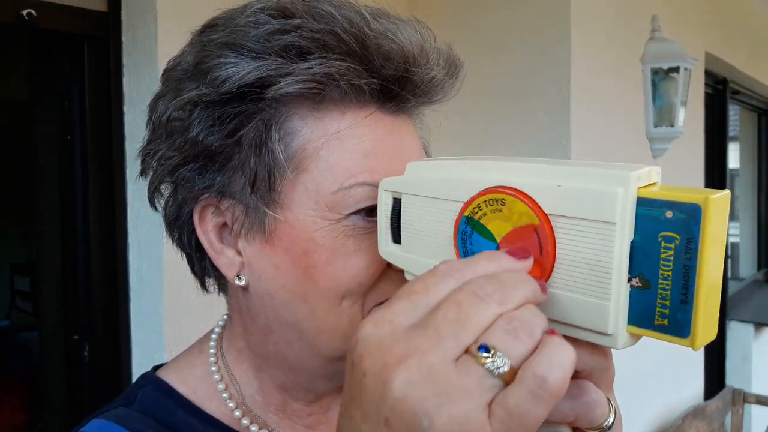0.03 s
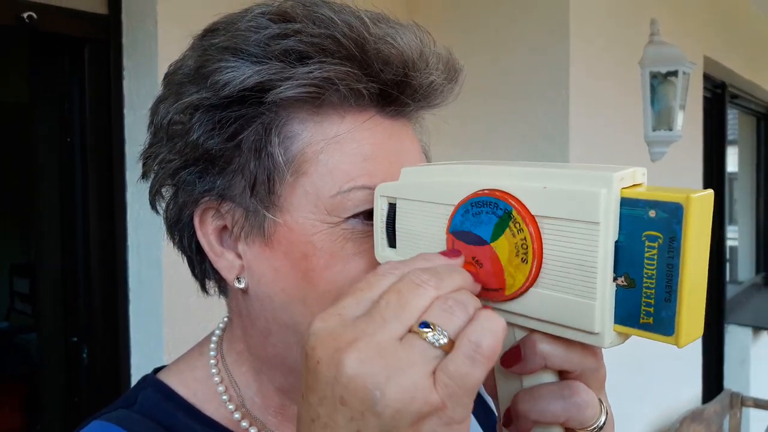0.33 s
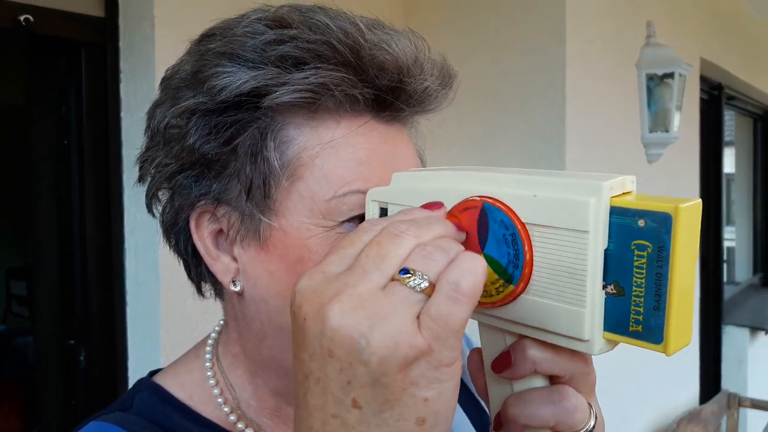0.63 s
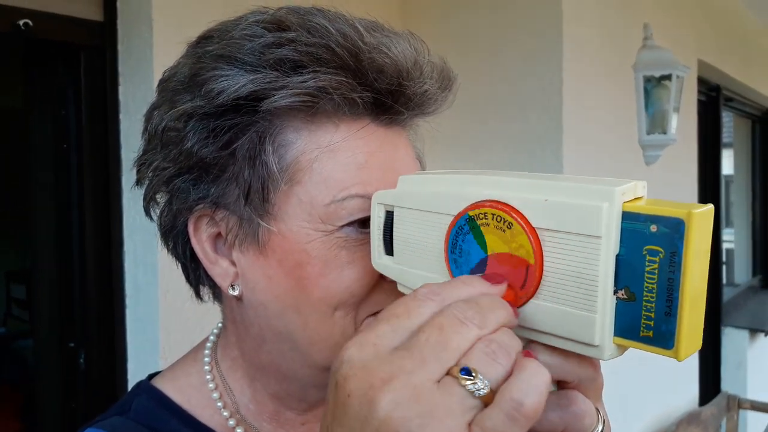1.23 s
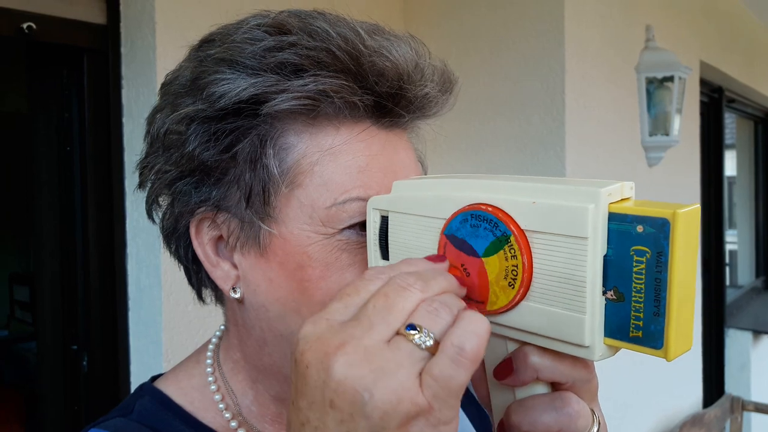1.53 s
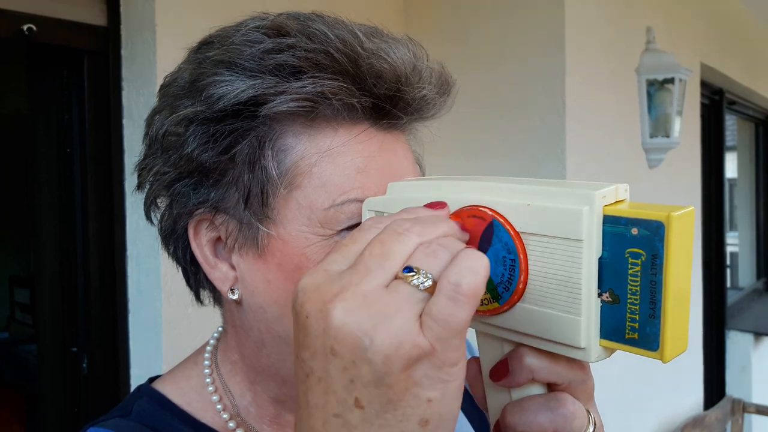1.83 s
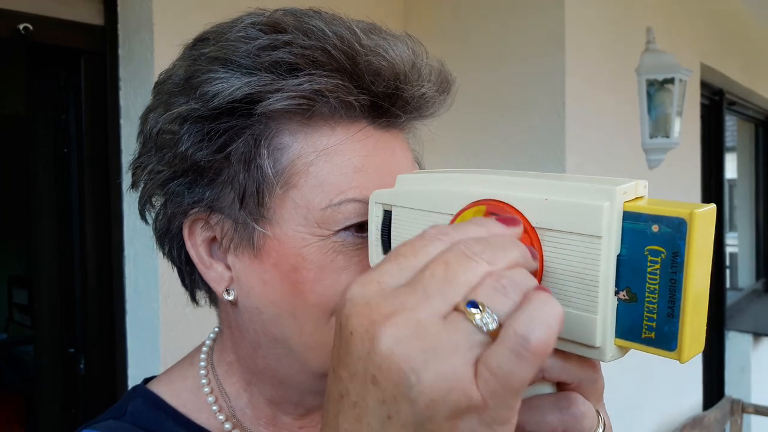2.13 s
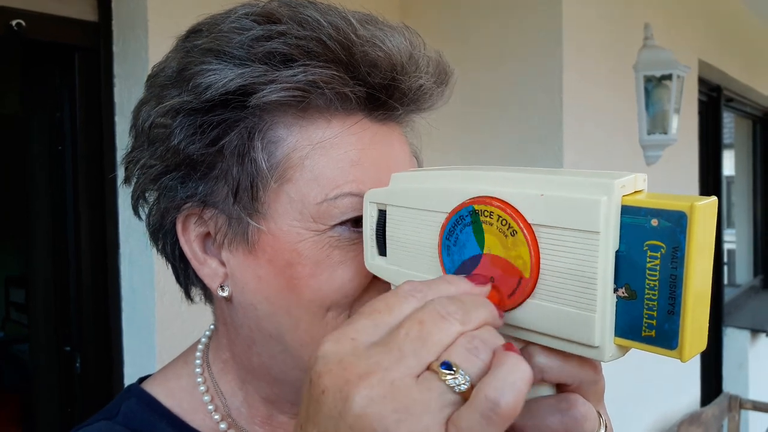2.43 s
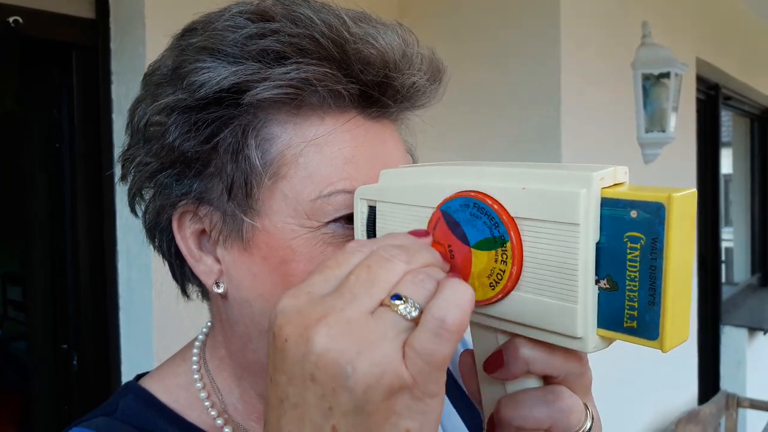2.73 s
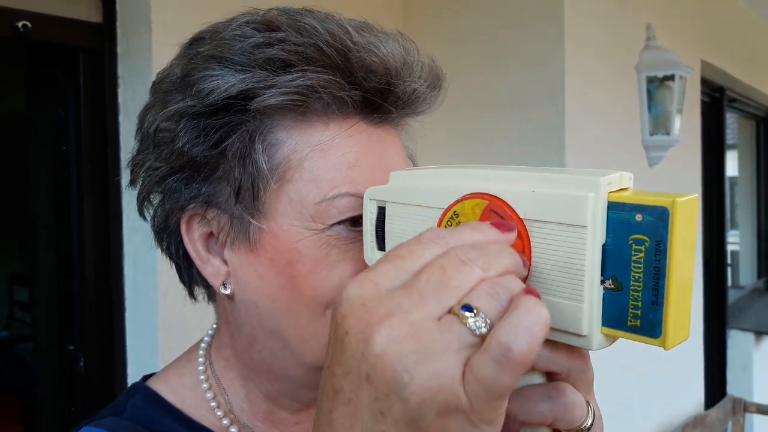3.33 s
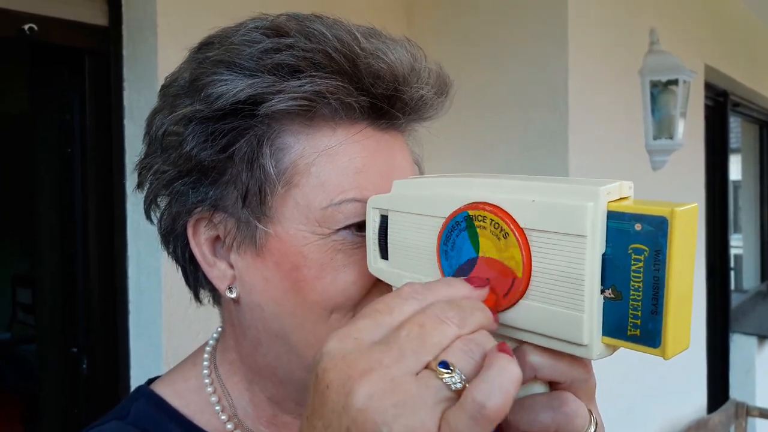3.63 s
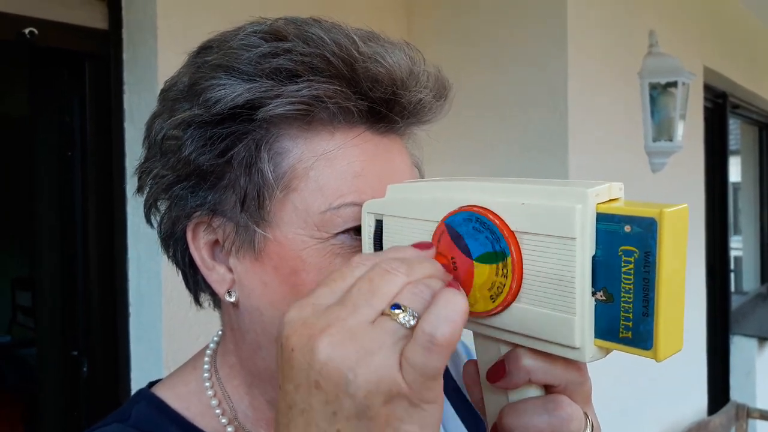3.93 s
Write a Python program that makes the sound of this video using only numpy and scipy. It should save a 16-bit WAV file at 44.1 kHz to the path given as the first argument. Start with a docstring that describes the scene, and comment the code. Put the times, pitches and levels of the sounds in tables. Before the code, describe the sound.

Rapid, slightly uneven ratchet clicks rattle through the hollow plastic case of a toy film viewer as it is cranked throughout. The sound is close and toward the left, with light small-room reverberation over a quiet hum.

```python
"""A hand-cranked toy film viewer

About ten times a second a pawl slips off a tooth, snaps home and chatters, close by, louder on the left.
Each impact excites the damped modes of the hollow plastic case, with a bright snap and a dense clatter.
Gear friction whirrs faintly between the clicks; a small room reverberates, over a low rumble and hum."""
import sys
import numpy as np
from scipy import signal
from scipy.fft import rfft, irfft, next_fast_len
from scipy.io import wavfile
from scipy.ndimage import map_coordinates

SR = 44100
rng = np.random.default_rng(int(sys.argv[2]) if len(sys.argv) > 2 else 0)


def waveform_to_disk(signal):
    """Save audio, clipped to [-1, 1], as 16-bit WAV at the path in sys.argv[1]."""
    frames = np.transpose(np.atleast_2d(signal))
    scaled = np.clip(frames, -1, 1) * 32767
    samples = np.round(scaled).astype(np.int16)
    wavfile.write(sys.argv[1], SR, samples)


N = 176400

# spectrum of the rumble (frequency [Hz], relative level [dB])
RUMBLE_SPECTRUM = [(20, -11), (50, -17), (68, -3), (125, 0.5), (180, -1.5), (260, -2), (400, -11),
                   (900, -6.5), (2000, -28), (5000, -30.5), (16000, -32)]
# tones of the hum (frequency [Hz], initial level [dB], settled level [dB])
HUM_TONES = [(62, -65.5, -67.5), (124.3, -77, -62.5), (676, -65.5, -60.5)]
# spectrum of the gear friction (frequency [Hz], relative level [dB])
GEAR_SPECTRUM = [(300, -12), (1100, -22), (1500, 3.5), (1850, 1.5), (2550, 2), (3300, -6), (5000, -24),
                 (7000, -64), (8400, -14), (10000, -35), (12500, -22), (16000, -18.5)]
# reverberation time of the room (frequency [Hz], T60 [s])
ROOM_DECAY = [(300, 0.71), (2000, 0.2), (8000, 0.25), (16000, 0.13)]
# colouring of the reverberation (frequency [Hz], gain [dB])
ROOM_GAIN = [(300, -2), (1200, 5.5), (2400, 0.5), (4500, 2), (8300, 1.5), (10000, -2), (15000, -1)]
# impacts of the pawl (time [s], relative ring level [dB], relative snap level [dB])
IMPACTS = [(0.015, 0.6, 0.3), (0.0788, -0.5, 1.1), (0.1587, -0.8, 0.3), (0.2396, -0.7, -0.6),
           (0.34, -0.3, -0.8), (0.4398, 0, 0.5), (0.551, 0.3, 1), (0.6555, -0.6, 1.1), (0.7535, -0.3, 0.2),
           (0.8349, 0.6, -0.7), (0.9225, 0, 0.3), (1.0238, 1, 0), (1.1037, 0.5, 0.0), (1.1979, 1.5, 0.2),
           (1.2716, -0.2, -0.8), (1.3569, -0.1, -1.5), (1.4721, 0, -1.8), (1.5662, 1, 1.1),
           (1.698, 0.1, 1.6), (1.801, 0.5, -0.5), (1.8703, 0, -1.2), (1.9866, -0.8, 0),
           (2.0844, -0.5, -1.6), (2.1786, -1, -1.2), (2.2564, 0.8, -1), (2.3284, 1, 0.6),
           (2.4131, 0.9, -1.3), (2.502, 0.6, -1), (2.6107, -0.7, -0.4), (2.705, 0.5, -1), (2.8072, 1, -1),
           (2.9279, 0.5, -0.7), (3.0008, -0.7, -1.5), (3.0986, 0.8, 0), (3.2116, 0.5, -1),
           (3.3089, 0.7, -0.7), (3.4021, 0.5, -2), (3.5072, -0.3, -0.9), (3.6119, 0.7, -1.8),
           (3.7113, 0.5, -1.5), (3.814, 0.6, 0.1), (3.9164, 0.4, -0.1)]
# modes of the case (frequency [Hz], relative level [dB], T60 [s])
CASE_MODES = [(505, -27.5, 0.08), (605.5, -28.5, 0.064), (720, -31.5, 0.09), (927, -23.5, 0.062),
              (1207, -24.5, 0.041), (1584, -38, 0.3), (1717, -12, 0.048), (1933, -20.5, 0.035),
              (2057, -8, 0.034), (2500, -9.5, 0.037), (2572, -4, 0.029), (2790, -22, 0.023),
              (3150, -15.5, 0.014), (3820, -31.5, 0.042)]
# resonances of the pawl (frequency [Hz], bandwidth [Hz], relative level [dB])
PAWL_RESONANCES = [(5320, 160, -2), (6140, 190, -44.5), (6250, 260, -8.5), (8010, 1300, -4.5),
                   (9320, 167, -7.5), (11230, 350, -3), (12300, 440, -4.5), (13300, 490, -10.5),
                   (14560, 520, -4), (16000, 580, -10)]
# spectrum of the plastic's clatter (frequency [Hz], relative level [dB])
CLATTER_SPECTRUM = [(200, -50), (420, -30), (550, -24), (1100, -11), (1700, 0), (2000, 5.5), (2300, 3.5),
                    (2550, -17), (2850, -1), (3300, 4.5), (4200, -5), (16000, -49)]
# level difference of the direct sound (frequency [Hz], left over right [dB])
TOY_BALANCE = [(500, 2), (900, 3), (1300, 6), (1750, 14), (2100, 10), (2600, 9), (3300, 10), (4500, 0),
               (6700, -1), (8300, 2), (13000, 2), (15500, 4.5)]
# phase difference of the direct sound (frequency [Hz], left minus right [rad])
TOY_PHASE_SHIFT = [(300, 0), (1210, .5), (3190, -1.9), (4740, -4.1), (6200, -5.5), (7320, -3.2),
                   (9470, -7.2), (10500, -5.5), (11200, -10.1), (14600, -12.8)]

CASE_DB, SNAP_DB, CLATTER_DB = -16.5, -23.5, -28.5
RUMBLE_DB, GEARS_DB, ROOM_DB = -55.5, -53.5, -15.5
SLIP_LEAD_S, TICK_LEAD_S, TICK_SCATTER_S = .003, .001513, .00029  # slip and tick precede the snap


def amp(db):
    return 10 ** (np.asarray(db) / 20)


def unit_rms(x):
    return x / np.sqrt(np.mean(x ** 2) + 1e-20)


def along(points, hz):
    """Interpolation on a logarithmic frequency axis."""
    f, v = np.transpose(points)
    return np.interp(np.log(hz + 1), np.log(f + 1), v)


def pan(db):
    """A level difference between left and right gives direction."""
    return amp(np.array([[db], [-db]]) / 2)


def filtered(x, response):
    """Linear filtering multiplies the spectrum by a frequency response."""
    n = x.shape[-1]
    m = next_fast_len(n + 4096)
    return irfft(rfft(x, m) * response(np.fft.rfftfreq(m, 1 / SR)), m)[..., :n]


def noise(response, width):
    """Coloured noise of unit rms; the side-to-mid ratio, width, decorrelates the channels."""
    mid, side = filtered(rng.standard_normal((2, N)), response)
    return unit_rms(np.array([mid + width * side, mid - width * side]))


def wobble(rate):
    """Smooth random modulation through rate knots a second."""
    return map_coordinates(rng.standard_normal(int(N * rate / SR) + 4), [np.arange(N) * rate / SR])


def add(track, start_s, sound):
    """Superposition of a sound on the track."""
    i = round(start_s * SR)
    part = sound[..., max(-i, 0):N - i]
    track[..., max(i, 0):max(i, 0) + part.shape[-1]] += part


def burst(t, t60, rise_s=.0064):
    """Exponential growth up to time 0, then exponential decay."""
    return amp(-60 * np.maximum(-t / rise_s, t / t60))


def background(settling_s=(1.2, 1.6)):
    """Low-frequency noise and a hum, modulated in amplitude and phase, that grows a little overall."""
    t = np.arange(N) / SR
    hum = np.zeros(N)
    for hz, initial_db, settled_db in HUM_TONES:
        rms = amp(np.interp(t, settling_s, [initial_db, settled_db]) + wobble(17))
        hum += rms * np.sqrt(2) * np.sin(2 * np.pi * hz * t + wobble(10))
    return hum + amp(RUMBLE_DB) * noise(lambda f: amp(along(RUMBLE_SPECTRUM, f)), width=.17)


def gears(waver_db=.5):
    """Uneven sliding friction radiates noise of wavering level."""
    envelope = amp(GEARS_DB + waver_db * wobble(29.7))
    return envelope * pan(db=7) * noise(lambda f: amp(along(GEAR_SPECTRUM, f)), width=.9)


def room(source):
    """Diffuse reverberation: each click is convolved with its own noise tail, shorter in the treble."""
    out = np.zeros((2, N))
    midpoints = [int((a[0] + b[0]) / 2 * SR) for a, b in zip(IMPACTS, IMPACTS[1:])]
    for i, j in zip([0] + midpoints, midpoints + [N]):
        hz, t, spectra = signal.stft(rng.standard_normal((2, SR // 3)), SR, nperseg=256)
        decay = amp(-60 * t / along(ROOM_DECAY, hz)[:, None])
        tail = signal.istft(spectra * decay, SR, nperseg=256)[1]
        tail = np.pad(tail / np.linalg.norm(tail[0]), ((0, 0), (200, 0)))  # arrives 4.5 ms late
        add(out, i / SR, signal.fftconvolve(source[:, i:j].mean(0)[None], tail, axes=1))
    return pan(db=2.5) * filtered(out, lambda f: amp(along(ROOM_GAIN, f)))


def contact_force(t, slip_db=-19, tick_db=-12, chatter_db=-12, chatter_t60=.009):
    """Impulsive excitation: a faint slip, a tick off the tooth, the snap, then dying chatter."""
    chatter = rng.standard_normal(len(t)) * (t > 0) * amp(-60 * abs(t) / chatter_t60)
    force = amp(chatter_db) * chatter / np.linalg.norm(chatter)
    for lead, db in (SLIP_LEAD_S, slip_db), (TICK_LEAD_S, tick_db):
        force[np.argmin(abs(t + lead + TICK_SCATTER_S * rng.normal()))] += amp(db)
    force[np.argmin(abs(t))] += 1  # the snap
    return force


def case(detune=.007, scatter_db=1.2, low_cut_hz=531):
    """Contact drives damped modes; a box small against the wavelength radiates little bass."""
    out, t = np.zeros(N), np.arange(SR // 2) / SR
    contact_t = np.arange(-300, 600) / SR
    for onset, ring_db, _ in IMPACTS:
        ring = np.zeros(len(t))
        for hz, mode_db, t60 in CASE_MODES:
            age = t[t < 2 * t60]
            envelope = amp(mode_db + scatter_db * rng.normal() - 60 * age / t60)
            mode_hz = hz * (1 + detune * rng.normal())
            ring[:len(age)] += envelope * np.sin(2 * np.pi * mode_hz * age + np.pi / 4)
        clack = signal.fftconvolve(ring, contact_force(contact_t))
        clack *= np.linalg.norm(ring) / np.linalg.norm(clack)
        add(out, onset + contact_t[0], amp(CASE_DB + ring_db) * clack)
    return signal.sosfilt(signal.cheby1(5, 1, low_cut_hz, "high", fs=SR, output="sos"), out)


def pawl(damping, tail_db=-12.5, tick_db=-13.5):
    """Noise bursts excite the pawl's resonances; the plastic's dense modes merge into a clatter."""
    def resonances(f):
        powers = (amp(db) ** 2 * (f * band) ** 2 / ((hz * hz - f * f) ** 2 + (f * band * damping) ** 2)
                  for hz, band, db in PAWL_RESONANCES)
        return np.sqrt(sum(powers))

    snap_envelope, clatter_envelope = np.zeros((2, N))
    t = np.arange(-SR // 100, SR // 10) / SR
    for onset, ring_db, snap_db in IMPACTS:
        lead = TICK_LEAD_S + TICK_SCATTER_S * rng.normal()
        tick = amp(tick_db) * burst(t + lead, t60=.014)
        strike = burst(t, t60=.014) + amp(tail_db) * burst(t, t60=.054)
        add(snap_envelope, onset + t[0], amp(snap_db) * np.maximum(strike, tick))
        add(clatter_envelope, onset + t[0], amp(ring_db) * burst(t, t60=.042))
    snap = snap_envelope * noise(resonances, width=1 / np.pi)
    clatter = clatter_envelope * noise(lambda f: amp(along(CLATTER_SPECTRUM, f)), width=1)
    return amp(SNAP_DB) * snap + amp(CLATTER_DB) * clatter


def scene():
    """Direct and reverberant fields add; the toy is louder on the left."""
    def stereo(f):
        """Level and phase differences vary with frequency; the right mostly leads, widening the clicks."""
        sides = np.array([[1], [-1]])
        return amp(sides * along(TOY_BALANCE, f) / 2) * np.exp(.5j * sides * along(TOY_PHASE_SHIFT, f))

    clack = case()
    direct = filtered(clack + pawl(damping=.93), stereo)
    reverberant = room(clack + pawl(damping=12))  # heard from all sides, the resonances blur
    return direct + amp(ROOM_DB) * reverberant + gears() + background()


def record(dry, ceiling=.5, cutoff_hz=16000):
    """Soft saturation rounds the highest peaks; a steep low-pass limits the bandwidth."""
    rounded = dry / (1 + (dry / ceiling) ** 4) ** .25
    return filtered(rounded, lambda hz: 1 / (1 + (hz / cutoff_hz) ** 120))


dry = scene()
out = record(dry)
waveform_to_disk(out)
```